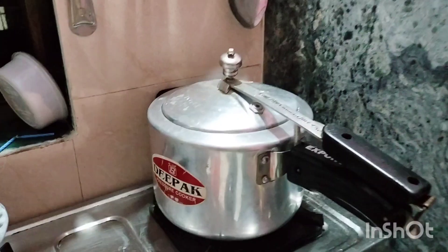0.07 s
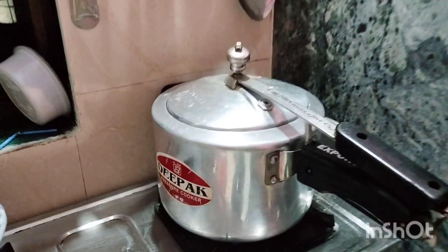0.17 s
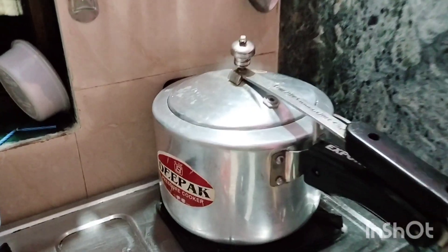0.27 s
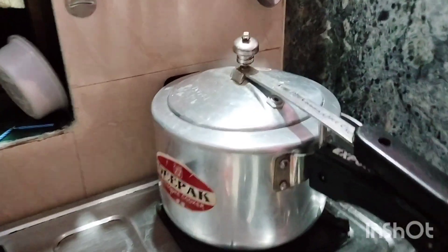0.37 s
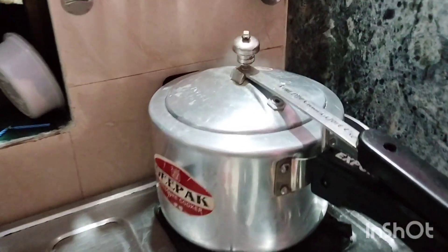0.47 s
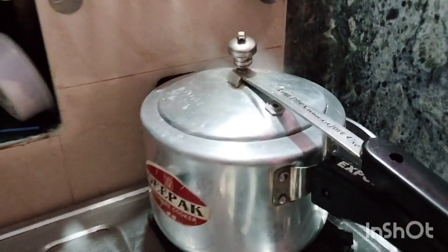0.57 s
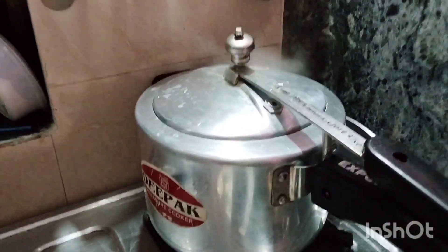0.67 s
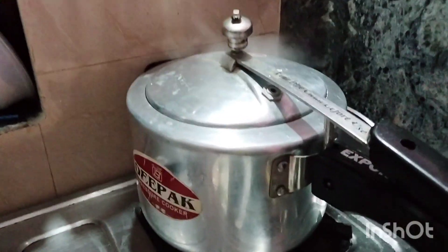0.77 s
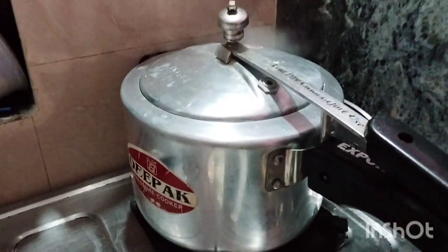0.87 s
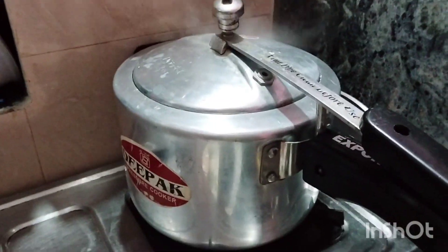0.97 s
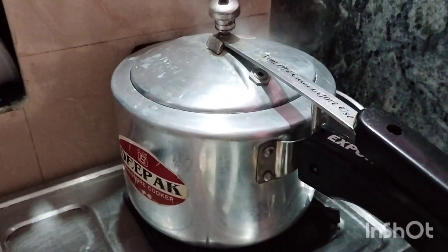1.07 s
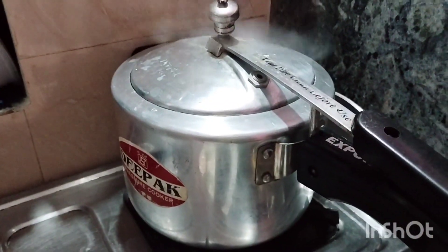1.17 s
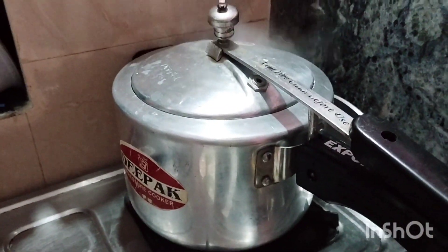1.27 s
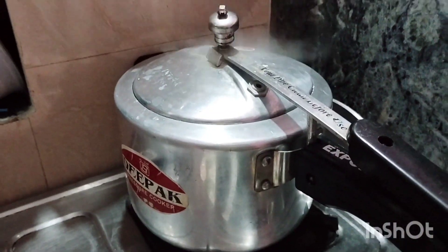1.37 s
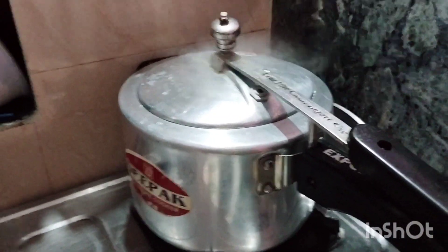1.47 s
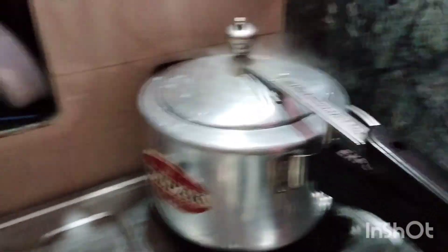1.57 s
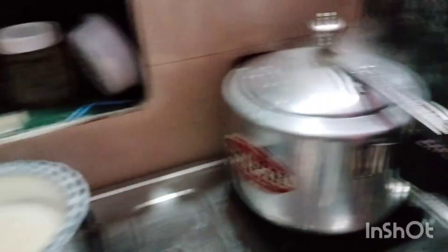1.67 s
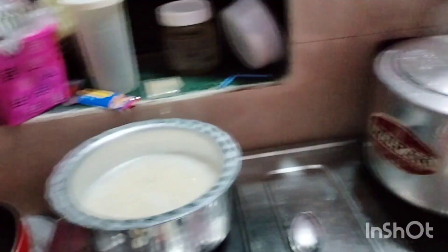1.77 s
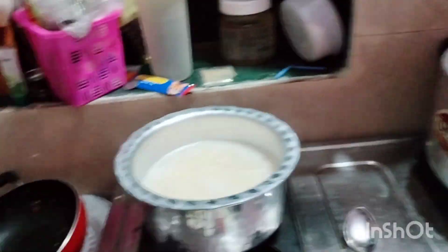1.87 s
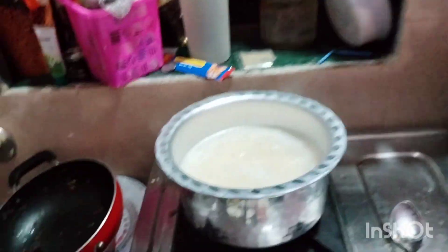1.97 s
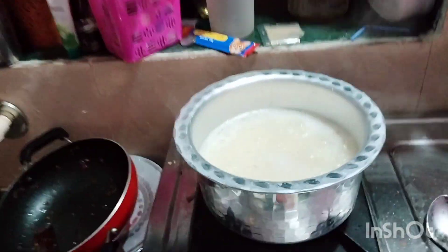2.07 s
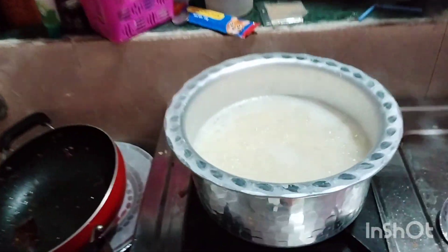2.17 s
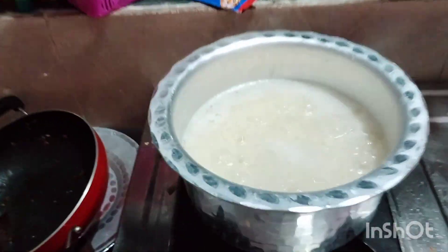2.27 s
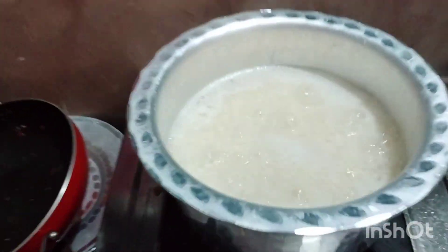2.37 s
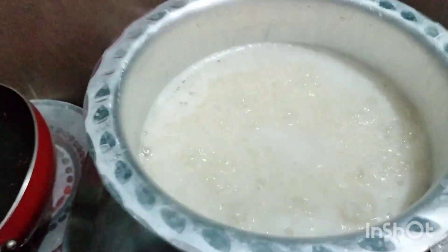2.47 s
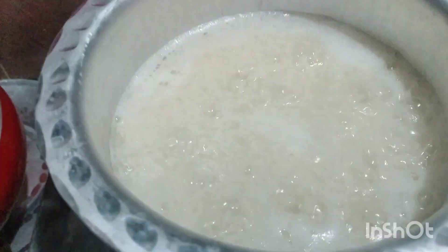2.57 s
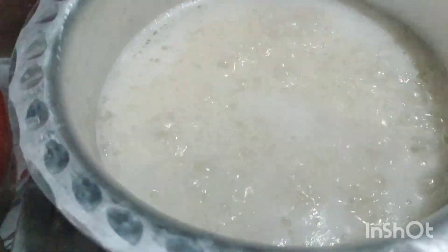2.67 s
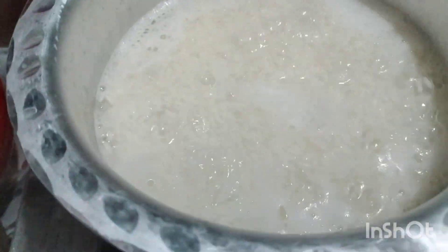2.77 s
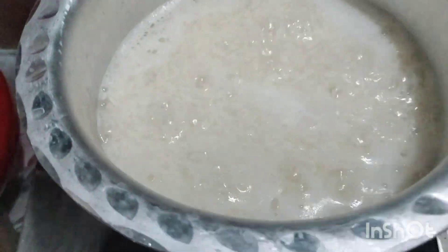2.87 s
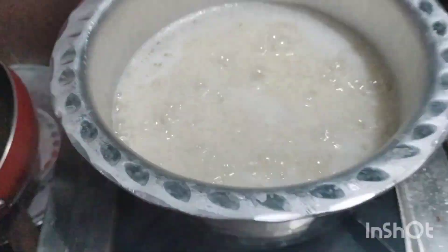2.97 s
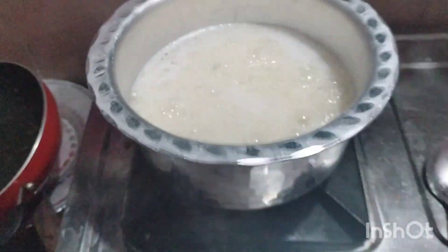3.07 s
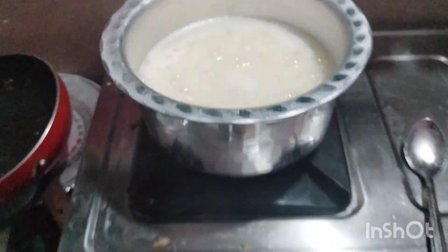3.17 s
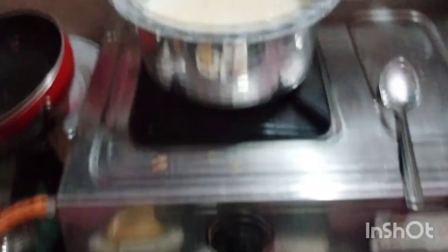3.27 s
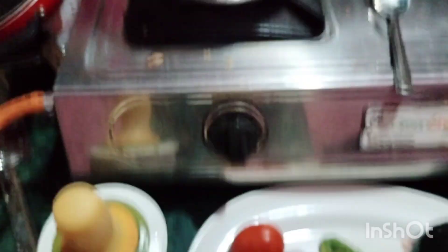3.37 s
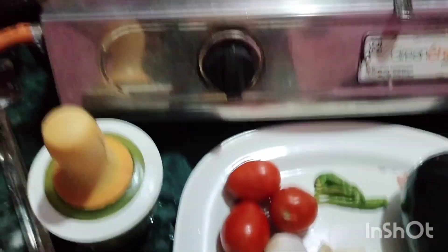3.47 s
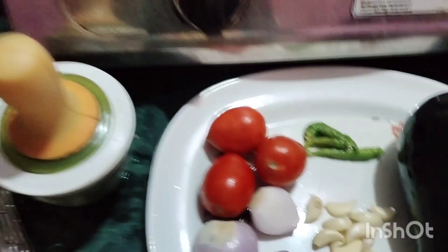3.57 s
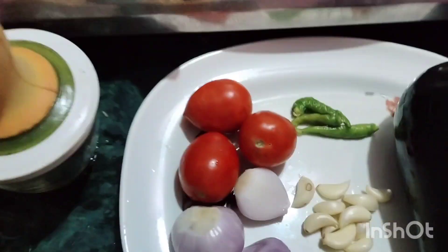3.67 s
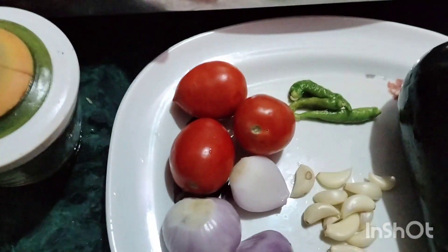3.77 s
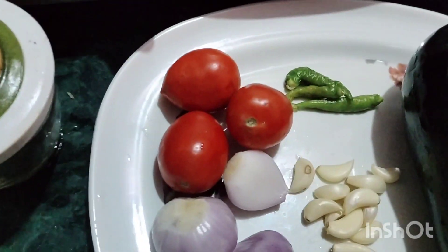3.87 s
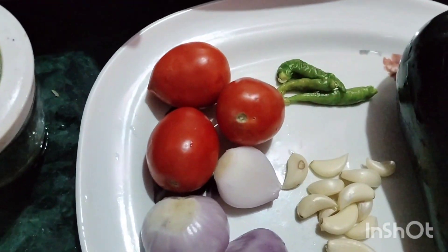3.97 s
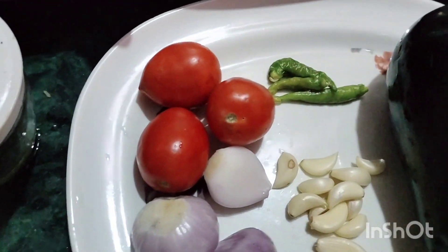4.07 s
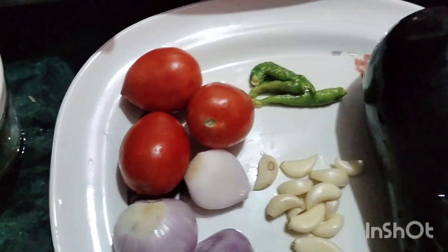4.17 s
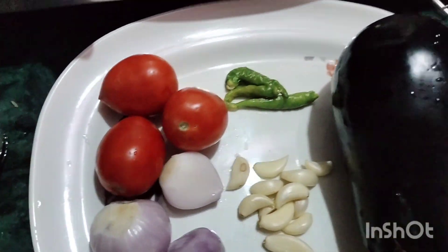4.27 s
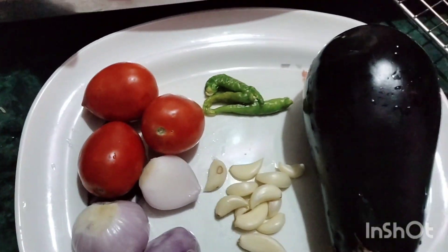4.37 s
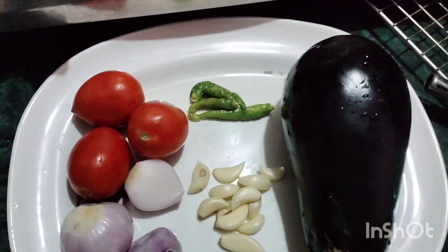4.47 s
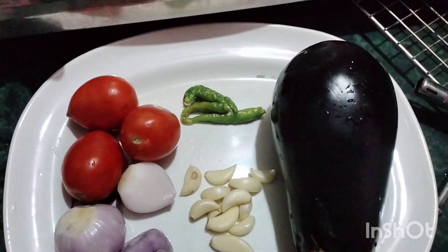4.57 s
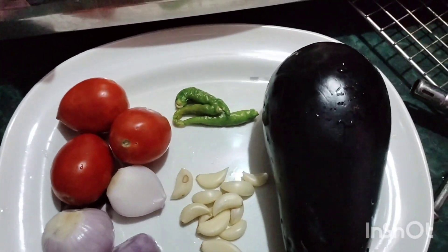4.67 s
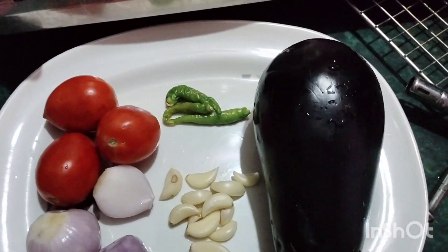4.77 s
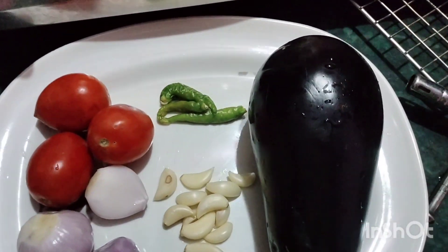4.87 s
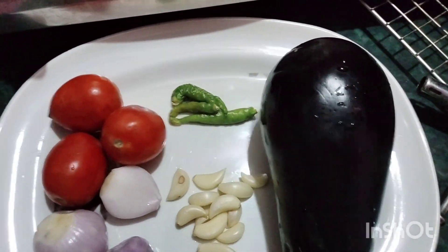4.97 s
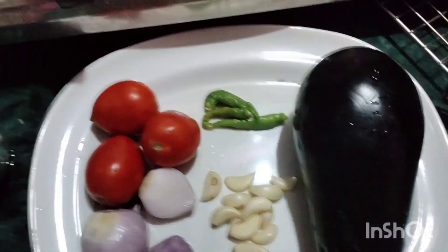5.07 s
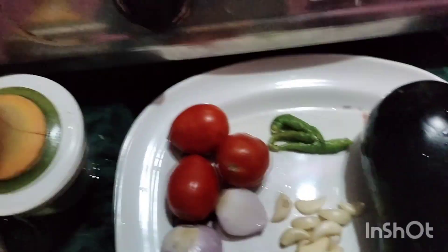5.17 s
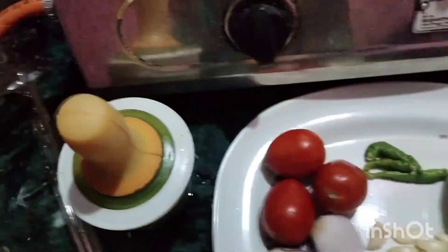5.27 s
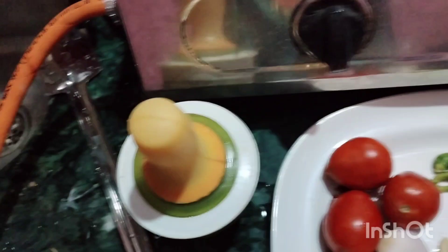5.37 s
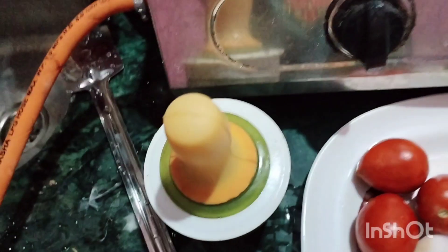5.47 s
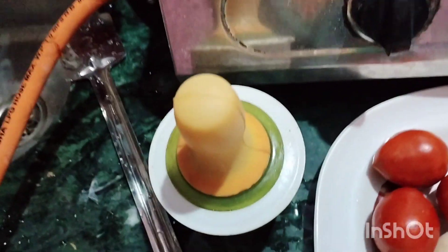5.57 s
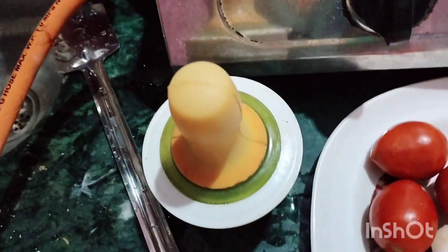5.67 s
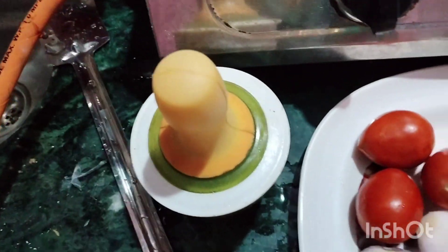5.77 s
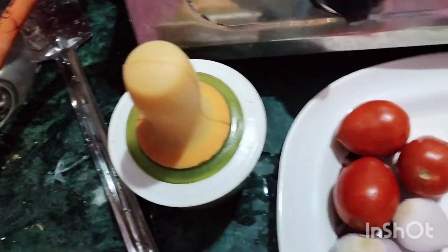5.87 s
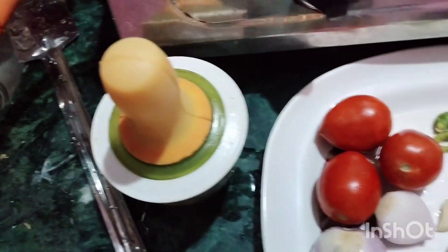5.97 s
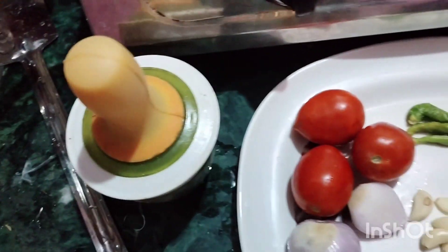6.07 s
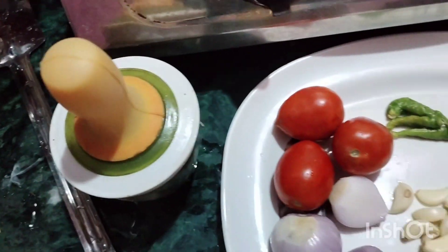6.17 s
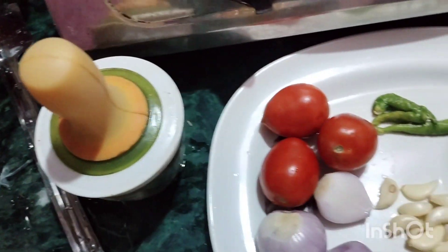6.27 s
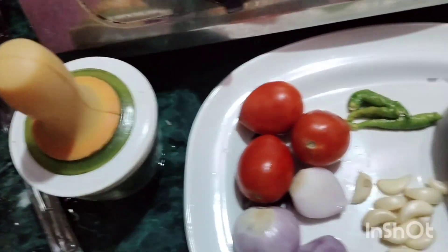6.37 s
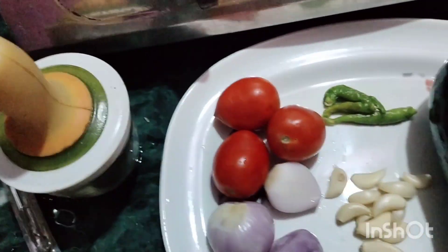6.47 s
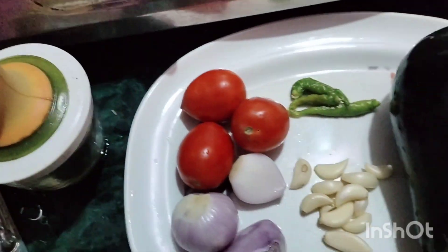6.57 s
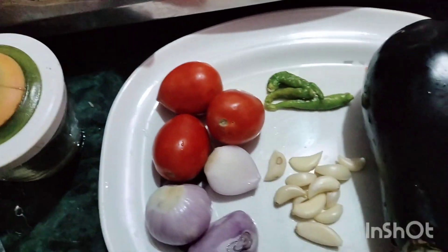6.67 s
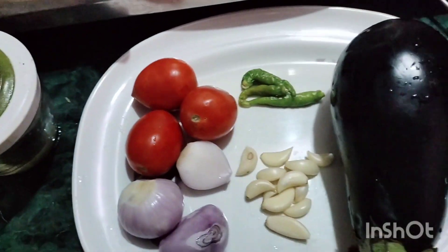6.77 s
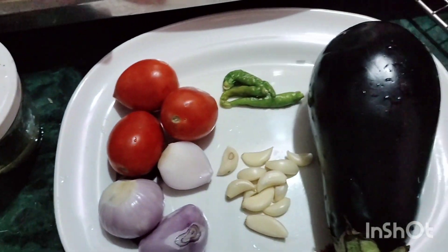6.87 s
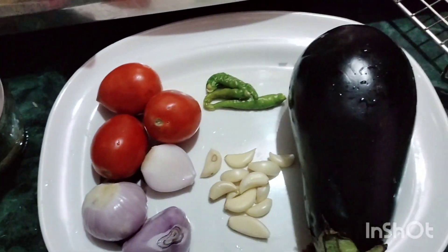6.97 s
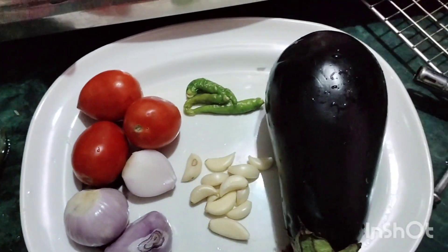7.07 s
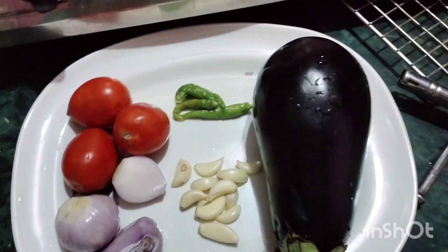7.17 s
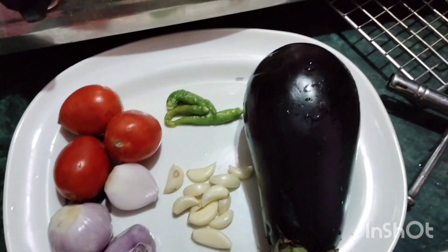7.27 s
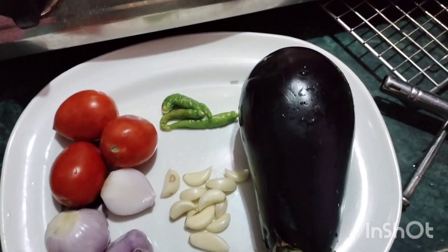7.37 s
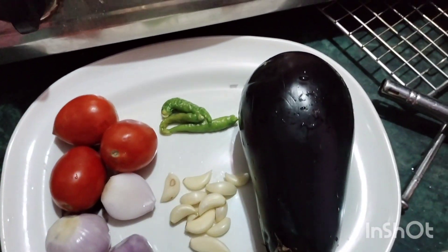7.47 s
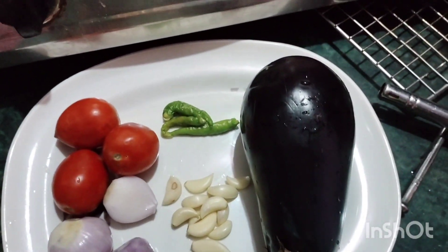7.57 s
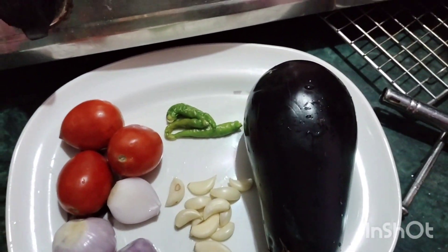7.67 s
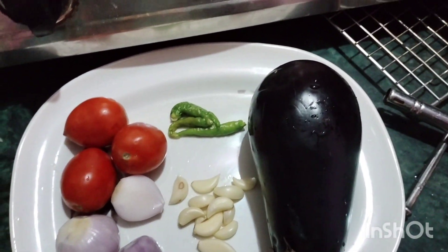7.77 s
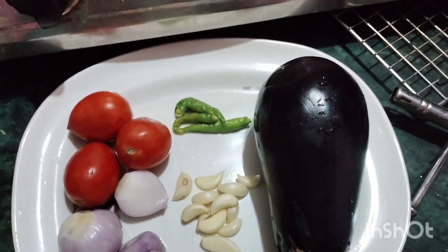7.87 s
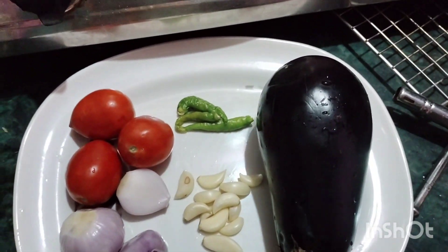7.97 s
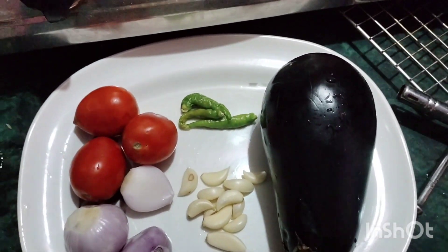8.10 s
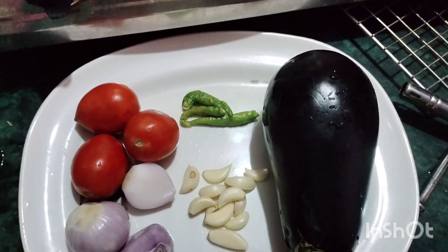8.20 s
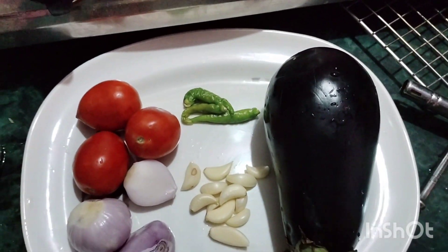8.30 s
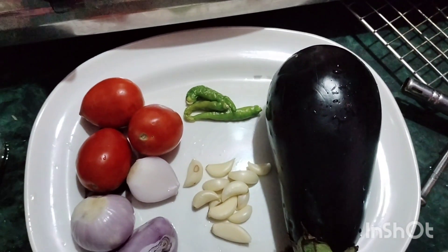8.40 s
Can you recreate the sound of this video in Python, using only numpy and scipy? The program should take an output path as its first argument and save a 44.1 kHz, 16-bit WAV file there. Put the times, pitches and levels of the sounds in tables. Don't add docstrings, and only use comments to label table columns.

```python
import sys
import numpy as np
from scipy import signal
from scipy.fft import next_fast_len
from scipy.io import wavfile

SR = 44100
rng = np.random.default_rng(int(sys.argv[2]) if len(sys.argv) > 2 else 0)


def gain_from_decibels(decibels):
    exponent = np.asarray(decibels, float) / 20
    return 10 ** exponent


def bounce(signal):
    frames = np.transpose(np.atleast_2d(signal))
    limited = np.clip(frames, -1, 1)
    pcm = np.round(limited * 32767).astype(np.int16)
    wavfile.write(sys.argv[1], SR, pcm)


N = 371983

# frequency in Hz, likeness from 0 to 1.
JET_LIKENESS = [(1000, .85), (2200, .75), (4000, .66), (12000, .6)]


def steam(size=1024):
    t, hz = grid(size)
    sputter_db = 2.04 * drifting(t, hz, 0.00077, 4500).real
    sputter_db += 0.3 * drifting(t, hz, 0.0083, 2500).real
    jet = chance(t, hz)
    same = read(JET_LIKENESS, hz)
    ports = []
    for power, echo in ((open_port(t, hz), .4), (cupped_port(t, hz), .36)):
        path = (1 + echo * drifting(t, hz, 0.28, 29.4)) / np.sqrt(1 + echo ** 2)
        skew = np.exp(2.3j * drifting(t, hz, .3, 110).real)
        patches_db = 0.58 * drifting(t, hz, 0.026, 430).real
        mixed = same * skew * jet + np.sqrt(1 - same ** 2) * chance(t, hz)
        ports.append(np.sqrt(power) * path * gain_from_decibels(sputter_db + patches_db) * mixed)
    return to_sound(np.array(ports), size)


# low edge in Hz, high edge in Hz.
OPEN_REGIONS = [(1800, 5000), (5500, 8000), (9000, 13000), (13300, 15700)]
# level when close in dB, then shares of cup turn, distance and screening.
OPEN_LEVELS = [
    (-26.5, 0.12, 0.19, 0.2),
    (-28, -0.12, .1, 0.034),
    (-24, -0.024, .4, .02),
    (-26.5, -0.016, 0.97, .02),
]
# frequency in Hz, density in dB per Hz.
OPEN_JET_COLOUR = [(300, -35), (700, -12.5), (1100, -16), (1500, -11), (2500, -6), (4000, -3), (5100, -3.5),
                   (7500, -4), (8100, -5), (9800, -8.5), (11300, -5.5), (12800, -7), (13600, -11),
                   (15600, -10)]
# frequency in Hz, width in Hz, lift in dB.
PORT_RESONANCES = [(6340, 310, 5), (10530, 170, 6.5)]
# start in seconds, end in seconds, first frequency in Hz, last frequency in Hz, lift in dB.
OPEN_PORT_ECHOES = [(.5, 1.7, 3800, 4040, 4), (1.64, 2.4, 3840, 4750, 6.5), (2.3, 3.45, 4500, 4400, 3.5),
                    (2.2, 3.18, 3930, 3740, 5.5), (.5, 1.8, 2360, 2400, 2.5), (2.23, 2.6, 5400, 5800, 7.5),
                    (.5, 1.9, 2200, 1750, 0), (1.97, 2.1, 6000, 6200, 6), (2.4, 3.07, 6500, 6200, 4),
                    (3.7, 4.23, 6000, 6100, 3.5), (4.5, 5.2, 6150, 6500, 3), (5.64, 6.2, 5960, 6330, 6.5),
                    (7.3, 7.4, 6100, 6400, 11), (3.75, 4.26, 7150, 7100, 8), (4.4, 5.3, 7500, 7700, 5),
                    (6.55, 7.1, 6800, 7200, 5.5), (4.4, 5.3, 4000, 3950, 4), (6.7, 8.5, 3900, 4300, 3),
                    (5.3, 8.5, 5350, 4560, -4), (3.5, 4.5, 5300, 5100, -4), (.7, 1.7, 10100, 11400, 2),
                    (2.5, 3.8, 11800, 12800, 3), (6.6, 6.9, 11600, 12400, 10), (6.1, 8.1, 7650, 7860, 5)]


def open_port(t, hz):
    modes_db = sum(db * peak(hz, f, w, w, 0.83) for f, w, db in PORT_RESONANCES)
    power = gain_from_decibels(read(OPEN_JET_COLOUR, hz) + modes_db)[None] ** 2
    gains = []
    for band, db in zip(OPEN_REGIONS, heard(OPEN_LEVELS, t)):
        gains.append(levelled(power, hz, band, db)[:, :1] / power[:, :1])
    centres_hz = np.mean(OPEN_REGIONS, 1)
    blend = np.array([np.interp(hz, centres_hz, row) for row in np.eye(len(gains))])
    shading = np.exp(np.log(np.hstack(gains)) @ blend)
    band_lifts = gain_from_decibels(band_lifts_db(OPEN_PORT_ECHOES, 248, t, hz)) ** 2
    return power * shading * band_lifts


# level when close in dB, then shares of cup turn, distance and screening.
CUP_LEVELS = [
    (-22, 0.97, 0.0029, 0),
    (-18, 1, 0.79, 0.27),
    (-36, 0.044, 0.17, 1.37),
    (-48, .02, 0.44, 0),
]
# frequency in Hz, density in dB per Hz.
HAND_LEAK_COLOUR = [(300, -16), (700, -8), (1100, -11), (1700, 0.5), (2400, 9.5), (4300, 1), (5300, -2),
                    (6000, -29), (6700, -13), (7400, -30), (8400, 4)]
# frequency in Hz, density in dB per Hz.
FINGER_COLOUR = [(12000, 2), (14300, 0), (15200, -2), (15800, -7)]
# time in seconds, top leak lift in dB, length in seconds.
FINGERS_PART = [(.7, 11, .3), (1.92, 13, .33), (3.3, 5, .2), (4.7, 4.5, .25), (5.35, 5, .3), (7.3, 5, .35)]
# start in seconds, end in
# seconds, first frequency in Hz, last frequency in Hz, lift in dB.
CUPPED_PORT_BANDS = [(.5, 1.62, 3700, 3770, 7), (1.62, 2.15, 2800, 2060, 4.5),
                     (6.85, 8.5, 2960, 3000, 3.5), (5.9, 8.5, 3830, 3800, 9.5),
                     (5.8, 8.5, 2200, 2380, 4.5), (1.95, 2.45, 4300, 4500, 6), (4.9, 5.4, 4200, 4200, -5),
                     (2.58, 3.16, 2140, 2500, 4), (3.67, 4.45, 2400, 2560, 3), (5.5, 6.35, 2370, 2300, 2),
                     (6.7, 7.2, 9200, 9050, 9), (4.2, 8.4, 8500, 8800, 8), (.5, 1.5, 11150, 10600, 5.5)]


def cupped_port(t, hz):
    first_db, second_db, side_db, top_db = heard(CUP_LEVELS, t)
    parting_db = sum(db * np.exp(-((t - s) / length) ** 2) for s, db, length in FINGERS_PART)
    top_db = top_db + parting_db[:, None]
    first_hz = columns(PHONE_PATH, t)[-1]
    second_hz = 10930 - 2.4 * (second_db - second_db.max()) ** 2
    band_lifts = gain_from_decibels(band_lifts_db(CUPPED_PORT_BANDS, 241, t, hz)) ** 2

    first_shape = peak(hz, first_hz, 1385, 870, 4.0) * band_lifts
    second_shape = peak(hz, second_hz, 3170, 2300, 5.9) * band_lifts
    high = 1 / (1 + np.exp((11500 - hz) / 700))
    side_shape = gain_from_decibels(read(HAND_LEAK_COLOUR, hz)) ** 2 * band_lifts * (1 - high)
    top_shape = gain_from_decibels(read(FINGER_COLOUR, hz)) ** 2 * high

    first_band, second_band = (1800, 4600), (8500, 12500)
    first_guess = levelled(first_shape, hz, first_band, first_db - 1)
    side = levelled(side_shape, hz, (4300, 5600), side_db, first_guess)
    second_guess = levelled(second_shape, hz, second_band, second_db)
    top = levelled(top_shape, hz, (13300, 15700), top_db, second_guess)
    first = levelled(first_shape, hz, first_band, first_db, side)
    second = levelled(second_shape, hz, second_band, second_db, side + top)
    return first + second + side + top


# time in seconds, cup turned from the jet in dB,
# distance loss in dB, screening by the pans in dB, first mode of the cup in Hz.
PHONE_PATH = [(.7, 0, -1.5, 1.5, 3600), (1.2, 0, -0.5, 2, 3500), (1.6, 0, 0, 0.5, 3440),
              (1.76, 2, 7, -0.5, 2850), (1.95, 6, 3, -0.5, 2740), (2.3, 7, 4, -0.5, 2800),
              (2.8, 7, 4, 3, 2540), (3.3, 7.5, 3, 2, 2540), (3.8, 7.5, 4.5, 4, 2460),
              (4.35, 11, 4.5, 5.5, 2300), (4.9, 8, 6, 6.5, 2500), (5.3, 7.5, 4.5, 6.5, 2720),
              (5.9, 6, 5, 7.5, 2740), (6.5, 5, 6, 8, 2870), (6.88, 2.5, 7, 5.5, 2760),
              (7.2, 0.8, 7.5, 6.5, 2870), (7.8, 1.1, 7.5, 6, 2950), (8.42, 2, 9.5, 6, 2900)]


def heard(shares, t):
    turn_db, distance_db, screen_db, _ = columns(PHONE_PATH, t)
    return [db - a * turn_db - b * distance_db - c * screen_db for db, a, b, c in shares]


def band_lifts_db(table, width_hz, t, hz, fade_s=0.078):
    out = np.zeros((len(t), len(hz)))
    for from_s, to_s, from_hz, to_hz, db in table:
        on = (np.tanh((t - from_s) / fade_s) - np.tanh((t - to_s) / fade_s)) / 2
        now = on > 1 / 1000
        centre = np.interp(t[now], [from_s, to_s], [from_hz, to_hz])
        out[now] += db * on[now, None] * np.exp(-((hz - centre[:, None]) / width_hz) ** 2)
    return out


# frequency in Hz, density in dB per Hz.
FLAME_COLOUR = [(12, -39), (20, -15), (51, -5.5), (103, 2.5), (163, -7.5), (219, -7), (351, -2), (403, -10),
                (448, -5.5), (582, -13), (731, -12), (1050, -21.5), (1300, -0.5), (1690, -29), (2860, -120)]
# frequency in Hz, likeness from 0 to 1.
FLAME_LIKENESS = [(30, .7), (60, .83), (110, .88), (400, .89), (700, .75), (1300, .6)]
# time in seconds, lift in dB.
FLAME_FLARES = [(1.66, 2), (2.55, 1), (3.0, 0), (3.62, 4.5), (4.06, 3), (4.63, 1), (5.05, -5), (5.58, 3),
                (5.921, 6), (6.7, 6), (8.05, 3.5), (8.28, 8)]


def burner(size=2048):
    t, hz = grid(size)
    flare_s = 0.039
    flares_db = sum(db * np.exp(-((t - s) / flare_s) ** 2) for s, db in FLAME_FLARES)
    rumble_db = -47.5 + flares_db[:, None]
    dipped = (1 + np.tanh((t[:, None] - 4.3) / 0.65)) / 2
    roar_db = -46.5 + 2.5 * dipped
    hob_db = 6 * (0.68 - dipped) * peak(hz, 348, 34.7, 34.7, 1)
    colour = gain_from_decibels(read(FLAME_COLOUR, hz) - hob_db) ** 2 / (1 + (hz / 1150) ** 12)

    roar = np.clip((hz - 170) / 80, 0, 1)
    power = (1 - roar) * levelled(colour, hz, (70, 200), rumble_db)
    power += roar * levelled(colour, hz, (220, 600), roar_db)
    same = np.clip(read(FLAME_LIKENESS, hz), 0, 1)
    left = chance(t, hz)
    lag = np.exp(-.6j * np.minimum(hz / 650, 1))
    right = same * left * lag + np.sqrt(1 - same ** 2) * chance(t, hz)
    lumps_db = 1.4 * drifting(t, hz, 0.051, 56).real
    return to_sound(np.array([left, right]) * np.sqrt(power) * gain_from_decibels(lumps_db + 0.44), size)


# time in seconds, left level in dB, right level in dB,
# top frequency in Hz, length in seconds.
AIR_PUFFS = [(3.02, -34.5, -35, 120, 0.027), (3.4, -45, -60, 70, 0.097), (3.57, -33, -54, 80.4, 0.078),
             (4.092, -45.5, -51.5, 60, .05), (4.23, -31.5, -55, 60, 0.033), (5.45, -45, -45, 80, 0.04),
             (5.582, -42, -44, 80, 0.037), (5.868, -43, -57, 69, 0.11), (5.963, -38, -56, 69.6, .05),
             (6.507, -46, -59.5, 70, 0.028), (6.695, -41, -54, 70, 0.024), (7.996, -39, -64, 80, 0.16)]


def puffs():
    out = np.zeros((2, N))
    t = np.arange(-8000, 8000) / SR
    for s, left_db, right_db, hz, length in AIR_PUFFS:
        low_band = signal.butter(2, [22, hz], "bandpass", fs=SR, output="sos")
        gust = signal.sosfilt(low_band, rng.standard_normal(len(t)))
        shape = np.exp(-2 * (t / length) ** 2)
        gust *= shape / np.sqrt(np.sum((gust * shape) ** 2) / np.sum(shape ** 2))
        at = round((s + t[0]) * SR)
        levels = gain_from_decibels(np.array([[left_db], [right_db]]))
        out[:, at:at + len(t)] += (levels * gust)[:, :N - at]
    return out


def evened(x):
    return x / np.sqrt(np.mean(abs(x) ** 2) + 1e-20)


def read(points, hz):
    f, value = np.transpose(points)
    return np.interp(np.log(hz + 1), np.log(f + 1), value)


def columns(table, t):
    s, *rest = np.transpose(table)
    return [np.interp(t, s, c)[:, None] for c in rest]


def grid(size):
    return np.arange(4 * N // size + 5) * size / 4 / SR, np.fft.rfftfreq(size, 1 / SR)


def chance(t, hz):
    return rng.standard_normal((len(t), len(hz), 2)) @ [np.sqrt(.5), 1j * np.sqrt(.5)]


def drifting(t, hz, lasts_s, wide_hz):
    t_all = np.arange(next_fast_len(len(t)))
    hz_all = np.arange(next_fast_len(len(hz)))
    slow = np.exp(-(np.pi * lasts_s * np.fft.fftfreq(len(t_all), t[1])) ** 2)[:, None]
    wide = np.exp(-(np.pi * wide_hz * np.fft.fftfreq(len(hz_all), hz[1])) ** 2)
    patches = np.fft.ifft2(chance(t_all, hz_all) * slow * wide)
    return evened(patches[:len(t), :len(hz)])


def held(power, hz, band):
    return (power * ((hz >= band[0]) & (hz < band[1]))).sum(-1, keepdims=True)


def levelled(power, hz, band, db, under=0):
    room = np.maximum(gain_from_decibels(db) ** 2 - held(under, hz, band), gain_from_decibels(db - 8) ** 2)
    return power * room / held(power, hz, band)


def peak(hz, centre_hz, below_hz, above_hz, steep):
    width_hz = np.where(hz < centre_hz, below_hz, above_hz)
    return (1 + ((hz - centre_hz) / width_hz) ** 2) ** -steep


def to_sound(z, size):
    frames = np.swapaxes(z, -1, -2) * np.sqrt(3)
    return signal.istft(frames, nperseg=size, noverlap=size * 3 // 4)[1][..., :N]


def dropped(x, size=2048, count=12):
    edge_hz, faint_db, faint_from_hz = 15750, -17, 4300
    window = np.sin(np.pi * (np.arange(size) + .5) / size)
    hz, _, z = signal.stft(x, SR, window, size, size // 2)
    power = abs(z) ** 2
    band = np.arange(len(hz)) // count
    bands = np.add.reduceat(power, np.arange(0, len(hz), count), axis=1)[:, band] / count
    below_edge = hz < edge_hz
    mean = power[:, below_edge].mean((0, 1))
    keep = (bands > mean * gain_from_decibels(faint_db) ** 2) | (hz < faint_from_hz)[:, None]
    return signal.istft(z * keep * below_edge[:, None], SR, window, size, size // 2)[1][:, :N]


def scene():
    return steam() + burner() + puffs()


def top_cut(x):
    return signal.sosfilt(signal.butter(12, 16990, fs=SR, output="sos"), x)


def record(dry):
    start_s, rise_s = .6282, .001
    cut_in = np.clip((np.arange(N) / SR - start_s) / rise_s, 0, 1)
    return top_cut(dropped(dry) * cut_in)


dry = scene()
out = record(dry)
bounce(out)
```